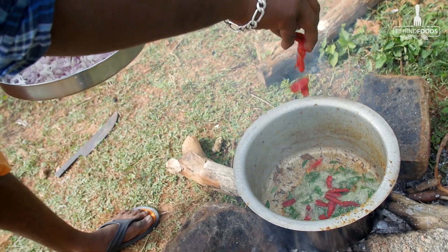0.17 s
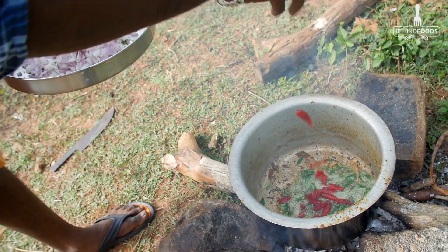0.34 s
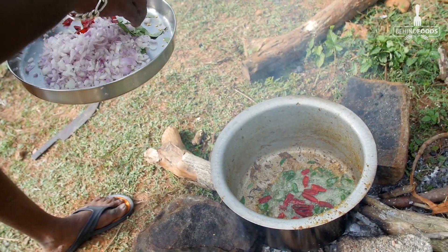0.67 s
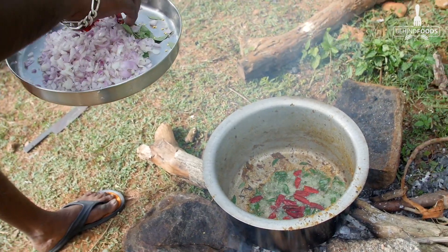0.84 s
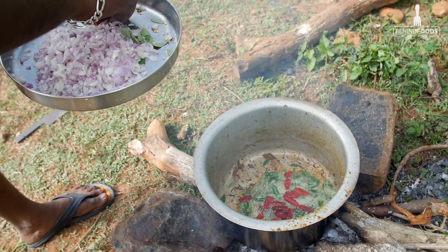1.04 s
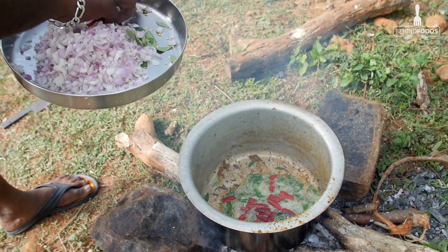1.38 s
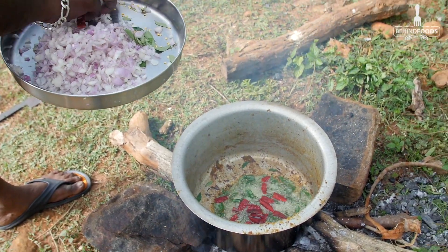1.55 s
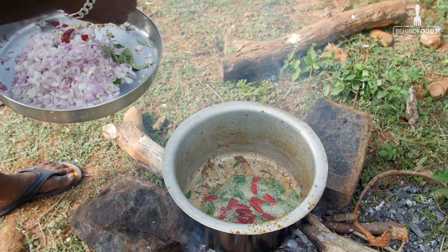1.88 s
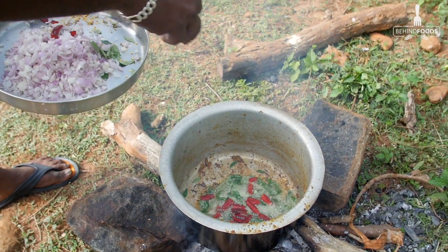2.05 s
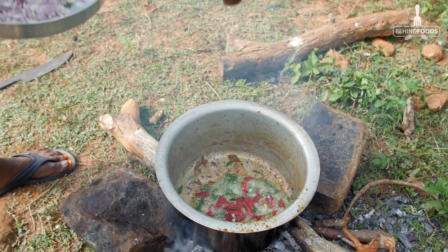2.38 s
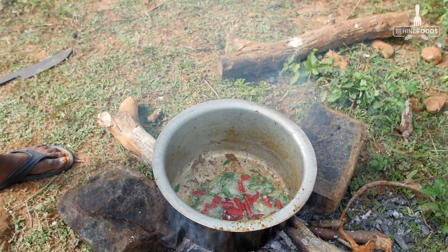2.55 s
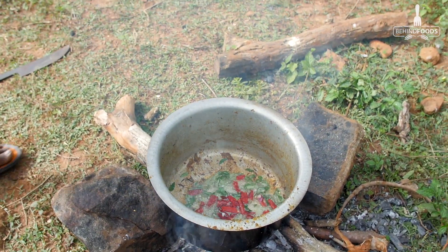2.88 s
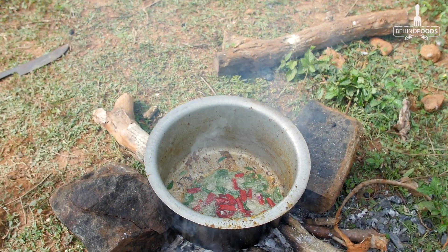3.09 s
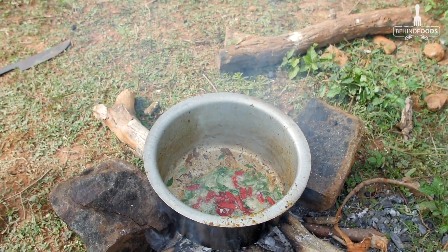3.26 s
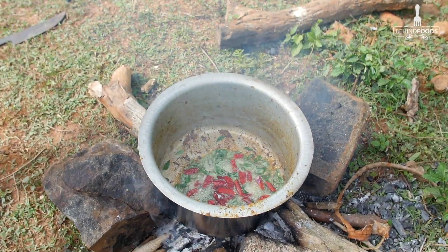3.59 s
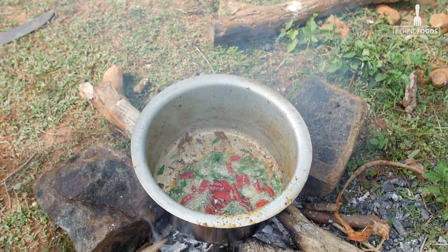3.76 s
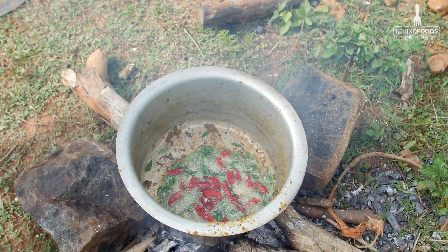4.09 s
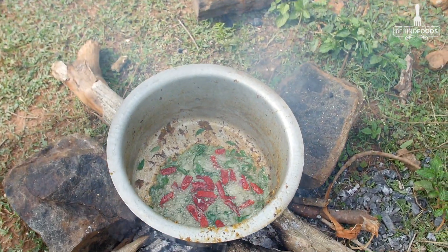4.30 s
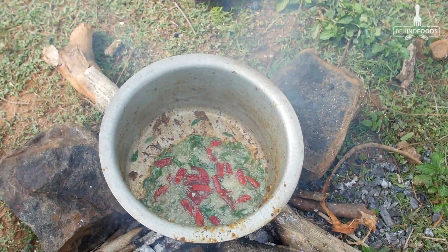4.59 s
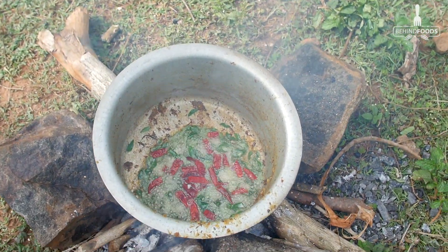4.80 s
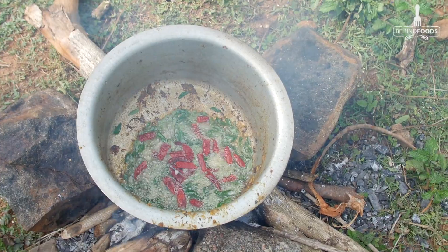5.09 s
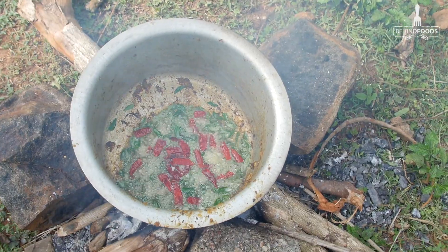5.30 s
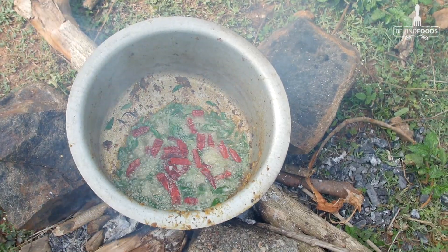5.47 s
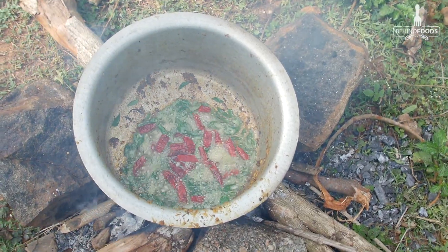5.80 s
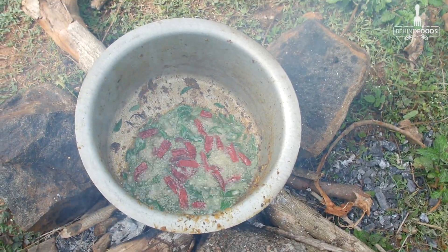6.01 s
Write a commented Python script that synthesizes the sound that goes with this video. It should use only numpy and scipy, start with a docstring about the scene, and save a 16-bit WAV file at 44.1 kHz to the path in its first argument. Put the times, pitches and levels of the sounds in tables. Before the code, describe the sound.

Continuous oil sizzle, coloured by the hollow resonance of a deep pot, over a faint low outdoor rumble. Dense crackling and dry pops of uneven loudness run through the first half, with wet spits and a short flare as pieces drop in. After about four seconds, heard closer above the pot, the treble fizz rises, larger bubbles blip, the rumble weakens and strong pops become sparser.

```python
"""A steady hiss of fine steam bubbles and sharp pops open the scene: leaves, dried chillies and garlic fry in hot oil
at the bottom of a deep aluminium pot, outdoors over a wood fire. Filtered noise and ringing bubbles make the foam,
spikes with decaying spray the bursting drops; resonances of the air in the pot colour them over a low rumble.
A handful of spices lands at about 2.4 s; later the microphone moves in over the rim and the hiss brightens."""
import sys
import numpy as np
from scipy import signal
from scipy.fft import rfft, irfft, next_fast_len
from scipy.io import wavfile
from scipy.ndimage import uniform_filter1d

SR = 44100
rng = np.random.default_rng(int(sys.argv[2]) if len(sys.argv) > 2 else 0)


def generate_wav(signal):
    """Clip the signal to [-1, 1] and save it as 16-bit WAV at the path in sys.argv[1]."""
    frames = np.transpose(np.atleast_2d(signal))
    scaled = np.clip(frames, -1, 1) * 32767
    pcm = np.round(scaled).astype(np.int16)
    wavfile.write(sys.argv[1], SR, pcm)


N = 270774

# spectrum of a bursting drop: f/Hz, level/dB
DROP_SPECTRUM = [(60, -58), (150, -18.5), (300, -1.5), (560, -2.5), (1100, -4), (1700, -6), (3000, -4.5),
                 (4500, 0.5), (6500, 0), (9500, -6), (12500, -14), (14000, -29), (16000, -62)]
# high-pass slope of the spray thrown up by a burst: f/Hz, level/dB
SPRAY_SPECTRUM = [(330, -12.5), (750, 0)]
# spectrum of the larger breaking bubbles: f/Hz, level/dB
LARGE_BUBBLE_SPECTRUM = [(300, -11), (1500, -4)]
# spectrum of the stirred air in the pot: f/Hz, level/dB
POT_AIR_SPECTRUM = [(100, -41.5), (220, -7), (330, -0.5), (480, -13.5), (700, -5.5), (1500, -60)]


def undb(db):
    """Amplitude gain is ten to the power of level/dB over 20."""
    return 10 ** (np.asarray(db) / 20)


def unit(x):
    """Normalise the mean power: scale to rms 1."""
    return x / np.sqrt(np.mean(x ** 2))


def slope(points, hz):
    """A spectrum through (Hz, dB) points, level being linear in log frequency."""
    f, db = np.transpose(points)
    return np.interp(np.log(hz + 1), np.log(f), db)


def bells(modes, hz):
    """Resonance curves: each mode lifts the level in dB by a bell around its frequency."""
    return sum(db / (1 + (2 * (hz - f) / width) ** 2) for f, width, db in modes)


def colour(x, points, shape=slope):
    """Minimum-phase filtering through the folded cepstrum: it rings after a click, never before."""
    size = 2 * next_fast_len(x.shape[-1] // 2 + 2048)
    hz = np.arange(size // 2 + 1) * SR / size
    cepstrum = irfft(np.log(undb(shape(points, hz))))
    cepstrum[1:size // 2] *= 2
    cepstrum[size // 2 + 1:] = 0
    response = np.exp(rfft(cepstrum))
    return irfft(rfft(x, size) * response)[..., :x.shape[-1]]


def even(x):
    """Spectral whitening: level a short sound in overlapping half-octave-spaced bands."""
    centres = 250 * 2 ** np.arange(0, 6.1, .5)
    hz = np.arange(1, len(x) // 2 + 1) * SR / len(x)
    weights = np.exp(-(2 * np.log2(hz / centres[:, None])) ** 2)
    power = weights @ np.abs(rfft(x)[1:]) ** 2 / weights.sum(axis=1)
    return colour(x, np.column_stack([centres, -10 * np.log10(power)]))


def walk(rate):
    """Low-passed random levels: held 1 / rate s, averaged twice over that time, rms 1."""
    k = int(SR / rate)
    steps = np.repeat(rng.standard_normal(N // k + 1), k)
    return unit(uniform_filter1d(uniform_filter1d(steps, k), k)[:N])


def add(track, s, sound):
    """Superposition: mix a short sound in at time s."""
    i = int(np.clip(s * SR, 0, N - 1))
    track[:, i:i + sound.shape[-1]] += sound[..., :N - i]


def ports(pair, pan_db):
    """Sum and difference stereo: left is middle plus side, right is middle minus side."""
    # side against middle at the two microphone ports: f/Hz, level/dB
    side_spectrum = [(200, -17.5), (330, -25.5), (520, -10.5), (750, -4), (1350, 0), (2400, -7), (4400, -5),
                     (7500, -23.5), (10000, -5.5), (14000, -19)]
    # the lean to one side grows with pitch, as long waves reach both ports more alike: f/Hz, level/dB
    lean_spectrum = [(400, 0), (900, 5.5)]
    lean = np.tanh(pan_db * np.log(10) / 40)
    side = colour(pair[1], side_spectrum) + lean * colour(pair[0], lean_spectrum)
    return np.array([pair[0] + side, pair[0] - side])


def burst(crack_s, spike=0, tail=0.23, tail_s=0.0035):
    """Impulse and decaying noise (middle, side): a spike, spray, bounces between the walls and a faint tail."""
    t = np.arange(2048) / SR
    bounces = .36 * np.exp(-t / .0035)
    envelope = np.exp(-t / crack_s) + bounces + tail * np.exp(-t / tail_s)
    y = rng.standard_normal((2, len(t))) * envelope
    y[0, 0] = spike
    return y / np.sqrt(np.sum(y ** 2, axis=1, keepdims=True))


def ring(hz, cycles, glide=0.022):
    """A bubble as a damped oscillator of unit energy, rising slightly in pitch as it starts to fade."""
    turns = hz * np.arange(2048) / SR
    phase = 2 * np.pi * turns * (1 + glide * np.minimum(turns / cycles, 2))
    y = np.sin(phase) * np.exp(-turns / cycles)
    return y / np.sqrt(np.sum(y ** 2))


def bubbles(count, low_hz, high_hz, cycles, spread_db):
    """Free damped oscillation: steam bubbles at random moments each ring for a few cycles as they break."""
    out, t = np.zeros((2, N)), np.arange(400) / SR
    for when, pitch, size, damping, place in rng.random((count, 5)):
        hz = low_hz * (high_hz / low_hz) ** pitch
        note = np.sin(2 * np.pi * hz * t) * np.exp(-t * hz / (cycles * (.5 + damping)))
        db = spread_db * min(-np.log(1 - size), 4.5)
        middle_side = [1, np.sqrt(2) * np.cos(2 * np.pi * place)]
        # the root of pitch makes up for the shorter ring of high notes
        add(out, when * N / SR, undb(db) * np.sqrt(hz) * np.outer(middle_side, note))
    return unit(out)


def over_rim(from_s=3.72, to_s=4.07):
    """Change of listening position: how far the microphone has moved in above the pot, 0 to 1."""
    return np.clip((np.arange(N) / SR - from_s) / (to_s - from_s), 0, 1)


def hiss(grain=0.56, flicker_db=-1.0):
    """Dense random events fuse to noise: the finest foam hisses, with single bubbles pricking through."""
    # spectrum of the foam: f/Hz, level/dB
    foam_spectrum = [(500, -98), (2000, -13), (4000, -9.5), (6400, 0), (7800, -5), (9200, -2),
                     (11000, -6.5), (12800, -10.5), (13600, -21), (14500, -52)]
    # treble straight out of the pot, once the microphone is over the rim: f/Hz, width/Hz, lift/dB
    direct_treble = [(5750, 320, 4), (6800, 980, 4.5), (8650, 420, 5)]
    fizz = bubbles(count=3200, low_hz=3250, high_hz=11670, cycles=6, spread_db=3.0)
    inside = colour(rng.standard_normal((2, N)) + grain * fizz, foam_spectrum)
    above = colour(inside, direct_treble, bells)
    over = over_rim()
    return unit((1 - over) * unit(inside) + over * unit(above)) * undb(flicker_db * walk(24.76))


def bubbling(grain=0.89, flicker_db=1.7, patchy_db=4.0):
    """Amplitude-modulated bubble noise: coarse bubbles seethe around the leaves in bunches, over foam."""
    # spectrum of the coarse foam: f/Hz, level/dB
    foam_spectrum = [(200, -25.5), (500, 1), (750, 3.5), (1100, 3), (1700, -12.5), (2600, -8),
                     (3500, -14.5), (5000, 5), (9000, -22.5), (14000, -54)]
    seethe = bubbles(count=1900, low_hz=1530, high_hz=5590, cycles=3.3, spread_db=3.0)
    seethe = colour(seethe, LARGE_BUBBLE_SPECTRUM)
    foam = unit(colour(rng.standard_normal((2, N)), foam_spectrum))
    bunches = unit(seethe * undb(patchy_db * walk(60)))
    return unit(foam * undb(flicker_db * walk(18)) + grain * bunches)


def crackle(count=520, spread_db=8, focus_db=12, crack_s=0.0007, low_hz=1900, high_hz=8500):
    """Random impulses: many small pops, each strongest around a pitch of its own."""
    out = np.zeros((2, N))
    for when, size, pitch in rng.random((count, 3)):
        db = spread_db * min(-np.log(1 - size), 2.2)
        hz = low_hz * (high_hz / low_hz) ** pitch
        focus = [(hz / 2, -focus_db), (hz, 0), (hz * 2, -focus_db)]
        tick = burst(crack_s, 7 * pitch)  # the higher, the spikier
        add(out, when * N / SR, undb(db) * colour(tick, focus))
    return unit(colour(colour(out, SPRAY_SPECTRUM), DROP_SPECTRUM))


def air_hum(flicker_db=5.0):
    """Cavity resonance under random drive: the air in the pot hums, its level flickering."""
    hum = unit(colour(rng.standard_normal((2, N)), POT_AIR_SPECTRUM))
    return hum * undb(flicker_db * walk(22))


def outdoor_rumble():
    """Coloured noise: a low outdoor rumble with narrow ridges in its spectrum."""
    # f/Hz, level/dB
    rumble_spectrum = [(20, -29), (75, -16), (92, -12), (105, 3.5), (120, -7.5), (145, 1.5), (185, -1),
                       (205, 2.5), (230, -0.5), (400, -5), (2000, -64)]
    return unit(colour(rng.standard_normal((2, N)), rumble_spectrum))


def pops(pan_db, gain_db=27.5, body_db=3, snap_db=1.0, push_db=-1, crack_s=0.00051, spike=4.12):
    """Sudden volume change radiates an impulse: drops flash to steam, louder ones with more in the first spike."""
    # the loudest drops: t/s, relative level/dB, relative body below 1.5 kHz/dB, relative snap above 5 kHz/dB
    drop_events = [(0.0182, -28.5, -11, 10.5), (0.0385, -26, -2.5, -2), (0.0614, -20, -6, -41),
                   (0.074, -28.5, -10, 2.5), (0.1771, -33.5, 6, -13), (0.1916, -25, -6, -3),
                   (0.2226, -32.5, 6, 4), (0.2696, -40.5, -17, 11.5), (0.3024, -34.5, -19, 3),
                   (0.3125, -25.5, -6, -2.5), (0.3446, -28.5, 2, -1), (0.37, -42.5, 3, 15),
                   (0.3817, -31, -2, -1), (0.3945, -21, -5.5, -13), (0.4031, -30.5, -8, 5),
                   (0.4668, -25.5, -8, -4.5), (0.5428, -24.5, -9, -12), (0.5672, -31, -0.5, 4),
                   (0.5939, -33, -4, 0), (0.6792, -24, 1.5, -30), (0.701, -31.5, 0, 6),
                   (0.7489, -26, 2, 1.5), (0.8593, -22, -8.5, -4), (0.8739, -33, -5, 5),
                   (0.8967, -23, -4.5, 6), (0.9997, -23, -2, -13), (1.038, -39, -13, 22),
                   (1.0545, -32, -2, 4), (1.0654, -21, -6, -0.5), (1.232, -23.5, -5.5, -0.5),
                   (1.2565, -28.5, -3.5, -4), (1.3793, -22, -5.5, 1), (1.398, -28, -7, -10),
                   (1.4045, -13, -7, -21.5), (1.446, -25, -8, -12), (1.4724, -32, 5.5, 3.5),
                   (1.508, -30.5, 1.5, -2), (1.5467, -22.5, 2.5, -9.5), (1.6341, -27.5, -4, -10),
                   (1.6422, -24, -10, 0), (1.6717, -29, -2.5, 1), (1.6815, -23, -8, -1.5),
                   (1.6957, -31.5, -3, 2), (1.796, -28.5, 0.5, -5), (1.8905, -23.5, -5, 5.5),
                   (1.9357, -34, 8.5, -10), (1.952, -24.5, -9, 5), (1.965, -23.5, -2.5, 3),
                   (1.982, -30, -11, -3), (2.0227, -29, -6, -16), (2.0586, -28, -3, 1),
                   (2.065, -27, -11, 9), (2.073, -27.5, -4, -3), (2.1261, -35, -1, 7),
                   (2.1452, -28, -5, -16), (2.2096, -24, -1, -5), (2.2648, -37, 2, 8.5),
                   (2.276, -27, -1.5, 1.5), (2.2849, -28, -8, -1), (2.3385, -22.5, -6.5, 3.5),
                   (2.4544, -29.5, 8.5, 3), (2.4906, -31.5, -2, 1), (2.523, -32.5, -5, 4.5),
                   (2.5512, -13, -12, -4.5), (2.5965, -24.5, -10, 0.5), (2.6205, -35.5, 16, -7),
                   (2.681, -25, -10.5, 1), (2.7405, -24, -11, -4), (2.765, -24.5, -5.5, -16),
                   (2.78, -26.5, -15, 3), (2.795, -33.5, 4, 3), (2.8354, -38.5, 10, 8),
                   (2.8796, -19, -6, 3.5), (2.956, -27, -3.5, 7.5), (2.9956, -34.5, 5, 2),
                   (3.0367, -18, -5, -3), (3.0416, -23.5, -7, 5.5), (3.071, -31.5, -2, -4),
                   (3.0928, -36, -1, 6), (3.1029, -30, -2, 2), (3.1097, -35, 10, 8),
                   (3.1166, -18.5, -19, -16), (3.1423, -20.5, -7, 7), (3.21, -23.5, -1, 5),
                   (3.2897, -25, -3.5, 6.5), (3.3177, -39.5, -5, 12.5), (3.3504, -36.5, 7.5, 3),
                   (3.3732, -34.5, 5, 2), (3.3968, -35.5, 8.5, 11.5), (3.473, -32, 0, 0),
                   (3.5031, -25.5, -4, -13), (3.5892, -35, 7, 3.5), (3.9829, -34, 0, 10.5),
                   (4.0511, -27, -4.5, -10), (4.1076, -27, -3.5, 11), (4.1376, -33, -1, 10),
                   (4.1872, -21, -1.5, 0), (4.39, -24.5, -3.5, 0), (4.4453, -26, -15, -14),
                   (4.4533, -28, -1, 13.5), (4.4681, -30.5, -11, -3), (4.6475, -35, -2, 1),
                   (4.6542, -28, 7.5, 5.5), (4.6651, -21.5, -5, 5), (4.7392, -26, -7, 7),
                   (4.8312, -26.5, 2.5, -4), (4.8446, -24.5, -6, 4), (5.0712, -19, -7, 1.5),
                   (5.1377, -35.5, -17, 10.5), (5.1718, -31, 1.5, 2.5), (5.2494, -30, -6, 9),
                   (5.4768, -25.5, -6, 3.5), (5.7948, -32.5, 3.5, -12), (5.8547, -32, 9.5, -3),
                   (5.9306, -23.5, -7, -22), (6.008, -26, -1.5, -10.5), (6.046, -28, 1, 9)]
    # bass from the push of a burst on the air: f/Hz, level/dB
    push_spectrum = [(420, 0), (800, -21), (2000, -36.5)]
    out = np.zeros((2, N))
    push = undb(push_db) * colour(signal.unit_impulse(2048), push_spectrum)
    for s, db, body, snap in drop_events:
        muffle = 1.54 * min(snap + 9, 0)  # the dullest bursts lose their upper middle too
        bass = 0.83 * (min(body, 12) + body_db)
        tone = [(350, bass), (1100, body + body_db), (2500, 0), (4300, muffle), (6500, snap + snap_db)]
        spike_height = spike * undb((db + max(snap, 0) + 23.0) / 2)
        crack = np.array([even(y) for y in burst(crack_s, spike_height)])
        sound = colour(colour(crack, SPRAY_SPECTRUM) + push, tone)
        add(out, s, undb(db + gain_db) * ports(sound, pan_db[int(s * SR)]))
    return colour(out, DROP_SPECTRUM)


def plops(gain_db=19, low_hz=255, high_hz=410, cycles=0.71, count=8, gap_s=0.017, fade_db=2.5):
    """Heavily damped oscillation: round low bubbles stir the pot's air in uneven, fading runs."""
    # soft pieces landing and heavy bubbles turning over: start t/s, length t/s, relative level/dB
    plop_runs = [(0.079, .055, -34.5), (0.437, 0.041, -34), (2.401, 0.02, -32), (2.436, 0.03, -31.5),
                 (2.475, 0.01, -32), (4.154, 0.012, -29.5), (4.539, 0.043, -35.5), (4.666, .01, -37),
                 (5.856, 0.0081, -32), (6.062, 0.049, -39)]
    out = np.zeros((2, N))
    for start, length, db in plop_runs:
        late = 0
        for chance, pitch in rng.random((count, 2)):
            if late <= length:
                fade = fade_db * late / length
                plop = ring(low_hz * (high_hz / low_hz) ** pitch, cycles)
                add(out, start + late, undb(db + gain_db - fade) * plop)
            late += gap_s * (.5 + chance)  # gap_s is the mean gap
    return colour(out, POT_AIR_SPECTRUM)


def spits(cycles=4.5, spray=0.33, spray_s=0.002):
    """Damped resonance with noise: a large bubble tears open in a short wet note and a puff of spray."""
    # large wet bubbles: t/s, pitch f/Hz, relative level/dB
    spit_events = [(0.1046, 3000, -17), (1.106, 5800, -8), (1.1812, 2700, -18), (2.3853, 2700, -16),
                   (2.391, 650, -12), (2.6646, 2900, -13.5), (4.157, 750, -9), (5.2277, 2000, -16),
                   (5.4312, 3600, -12.5), (5.4969, 2650, -12.5), (5.512, 2000, -19), (6.0211, 2700, -13)]
    out = np.zeros((2, N))
    for s, hz, db in spit_events:
        sound = spray * colour(colour(burst(spray_s), SPRAY_SPECTRUM), DROP_SPECTRUM)
        sound[0] += ring(hz, cycles)  # the note lies in the middle signal alone
        add(out, s, undb(db) * sound)
    return colour(out, LARGE_BUBBLE_SPECTRUM)


def flares(count=45, spread_db=4):
    """Rising and falling event density: a wet piece meets the oil and a swarm of tiny bursts swells and dies."""
    # sputtering wet pieces: approximate middle t/s, nominal length t/s, relative level/dB, treble tilt/dB
    flare_events = [(0.514, 0.054, -42, 0.5), (0.632, 0.027, -38.5, 3), (1.487, 0.059, -40, 8),
                    (1.663, 0.081, -45, 5.5), (2.447, .1, -39, 3), (5.432, 0.046, -42, 6.5)]
    out = np.zeros((2, N))
    for s, length, db, tilt in flare_events:
        swarm = np.zeros((2, SR // 4))
        for early, late, size in rng.random((count, 3)):
            # the sum of two even chances is likeliest halfway
            add(swarm, 0.79 * length * (early + late), undb(2 * spread_db * size) * burst(0.002))
        swarm = colour(colour(swarm, DROP_SPECTRUM), [(2500, -tilt), (6000, tilt)])
        loudness = np.sqrt(length * SR / np.sum(swarm[0] ** 2))
        add(out, s - 0.76 * length, undb(db) * swarm * loudness)
    return out


def blips(level_db=-53.5, patchy_db=4):
    """Clustered damped oscillations: larger bubbles break on top of the foam, heard only from above the rim."""
    large = bubbles(count=900, low_hz=1435, high_hz=2750, cycles=2.8, spread_db=2.5)
    clusters = unit(large * undb(patchy_db * walk(16)))
    return undb(level_db) * over_rim() * colour(clusters, LARGE_BUBBLE_SPECTRUM)


def scene(hiss_db=0, bubbling_db=-5.5, air_db=-19.0, air_over_rim_db=-4):
    """Cavity coupling: all sounds from the oil pass the pot's resonances; the rumble bypasses them."""
    # how hard the oil fries: t/s, relative fine hiss level/dB, relative bubbling level/dB
    frying = [(0.0, -43, -43), (0.36, -44.5, -43.5), (0.56, -44, -41), (1.28, -44, -44.5), (1.52, -44, -41),
              (2.24, -43.5, -42.5), (2.46, -41, -40.5), (3.4, -44, -44), (4.22, -40, -41.5),
              (5.44, -39, -43), (6.14, -40.5, -41)]
    # the microphone's position: t/s, low rumble level/dB, left minus right before the treble lean/dB,
    # small crackle against the bubbling column/dB
    position = [(0, -51.5, -2.5, -11.5), (1.1, -53.5, -1, -6.5), (2.4, -56, -0.5, -2.5),
                (3.7, -61, -0.1, -3.5), (6.1, -60.5, 0.5, -5.5)]
    # air resonances of the pot, with one null among them: f/Hz, width/Hz, lift/dB
    pot_modes = [(252, 9, 4), (288, 10, 9), (350, 38, 10), (402, 80, 6.5), (838, 48, 4), (1290, 30, 6),
                 (1470, 220, 7.5), (1665, 110, -4), (1940, 300, 6), (2466, 467, 8.3), (2900, 204, 6),
                 (3330, 595, 7)]
    # air swinging from wall to wall after a pop; it cancels above the middle: f/Hz, width/Hz, lift/dB
    cross_mode = [(846, 55, 6.5)]
    t = np.arange(N) / SR
    fry_s, *fry_levels = np.transpose(frying)
    fine, coarse = (np.interp(t, fry_s, column) for column in fry_levels)
    view_s, *view_levels = np.transpose(position)
    low, pan, crisp = (np.interp(t, view_s, column) for column in view_levels)
    over = over_rim()
    rumble = outdoor_rumble() * undb(low)
    oil = hiss() * undb(fine + hiss_db)
    oil += bubbling() * undb(coarse + bubbling_db)
    oil += crackle() * undb(coarse + crisp)
    oil += air_hum() * undb(coarse + air_db + air_over_rim_db * over)
    drops = pops(pan)
    drops = over * drops + (1 - over) * colour(drops, cross_mode, bells)
    oil += plops() + spits() + flares() + blips()
    return colour(ports(oil, pan) + drops, pot_modes, bells) + ports(rumble, 0)


def record(dry, left_db=-0.02, top_hz=16400):
    """Transducer response: the left port is slightly less sensitive, both dip in the treble, the top is cut off."""
    # dips of the microphone port: f/Hz, width/Hz, level/dB
    port_dips = [(5330, 250, -2.5), (6200, 300, -2.5), (7530, 90, -13), (11350, 600, -2.5)]
    heard = colour(dry, port_dips, bells) * undb([[left_db], [0]])
    return signal.sosfilt(signal.ellip(8, .2, 70, top_hz, fs=SR, output="sos"), heard)


dry = scene()
out = record(dry)
generate_wav(out)
```